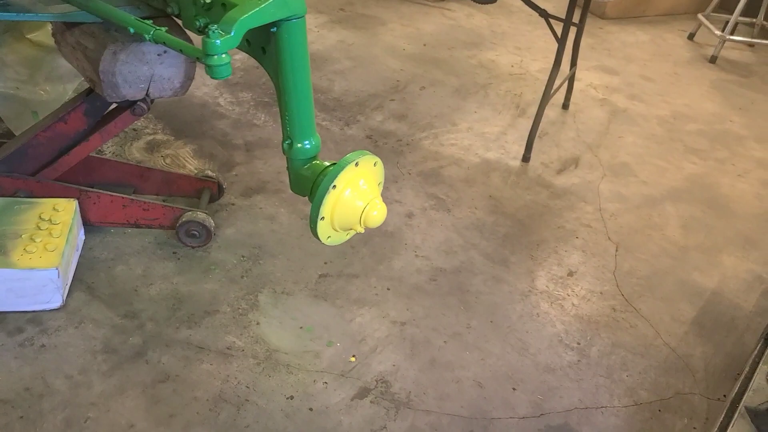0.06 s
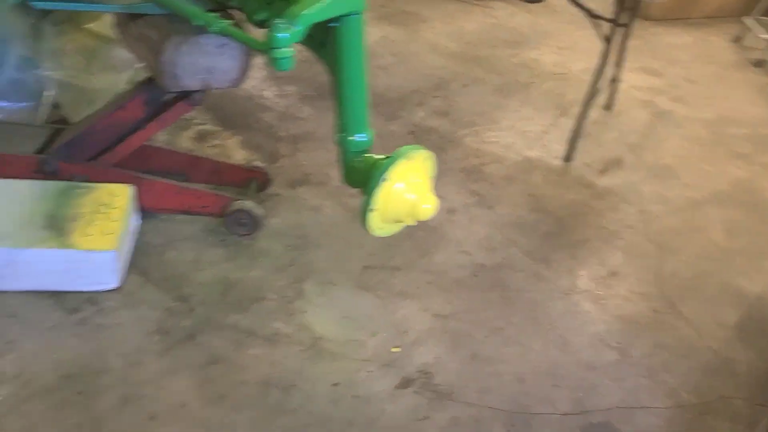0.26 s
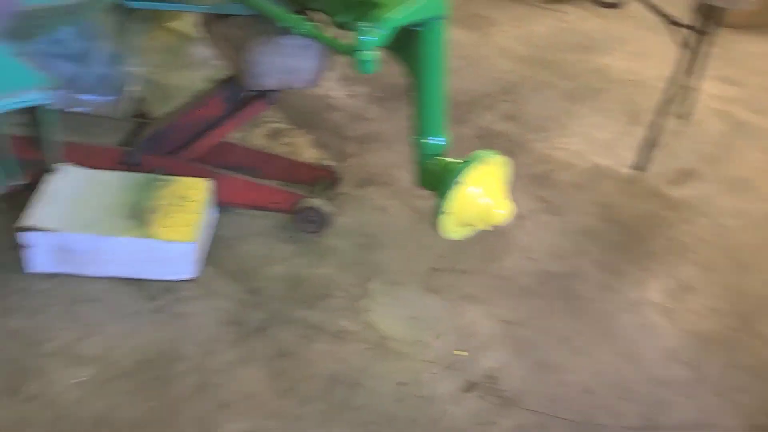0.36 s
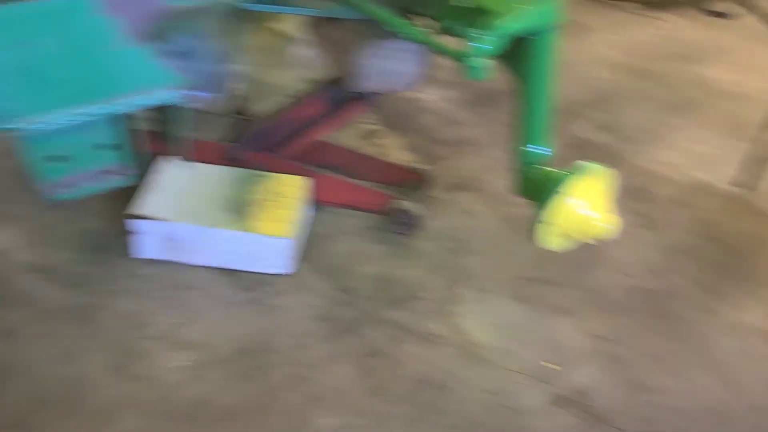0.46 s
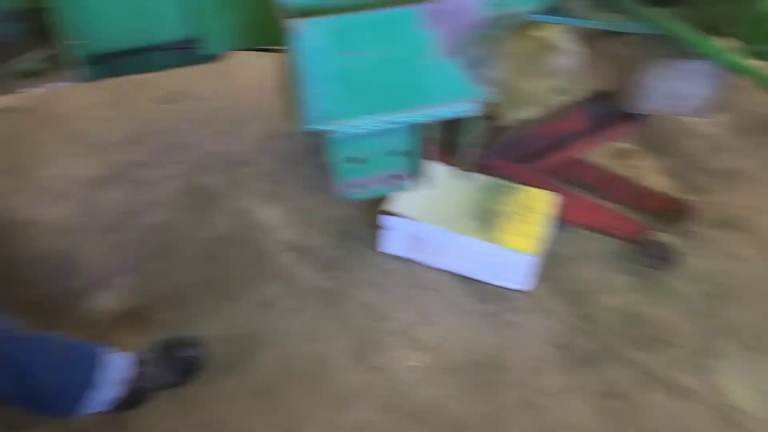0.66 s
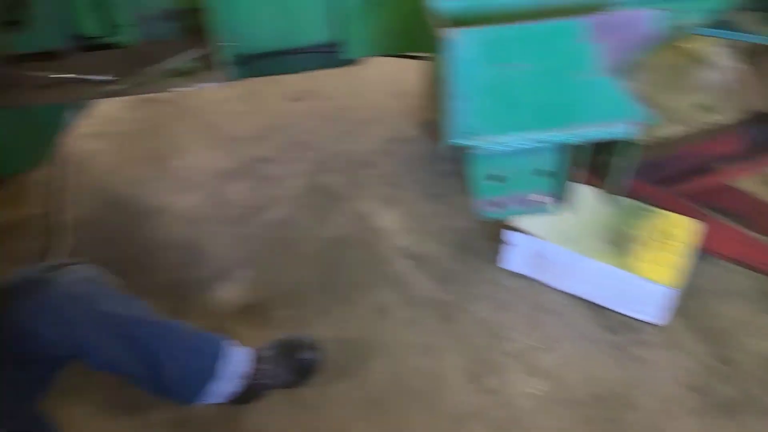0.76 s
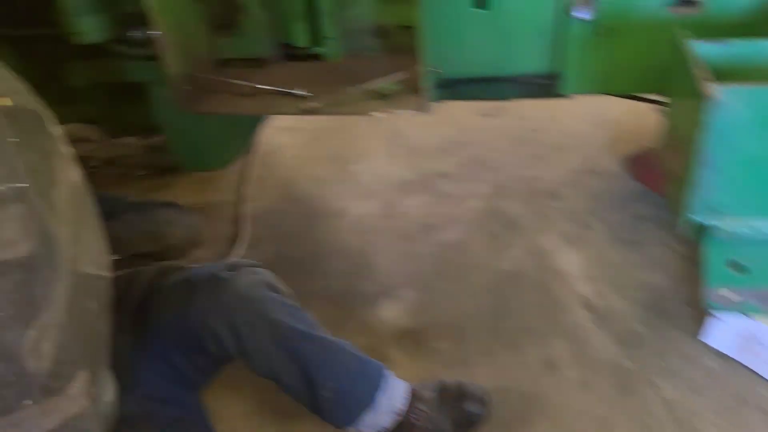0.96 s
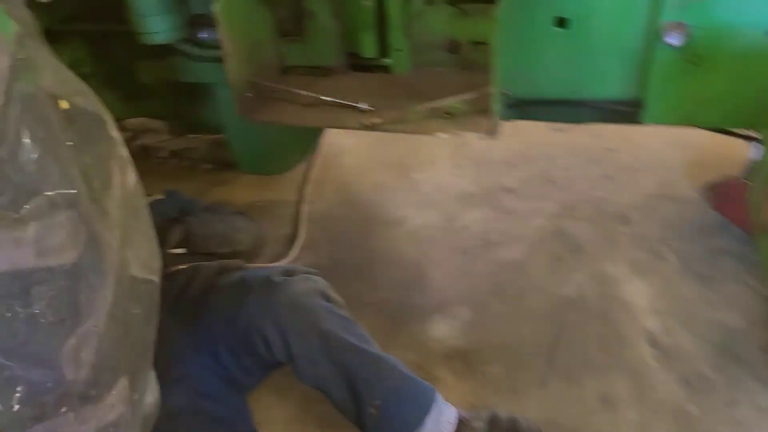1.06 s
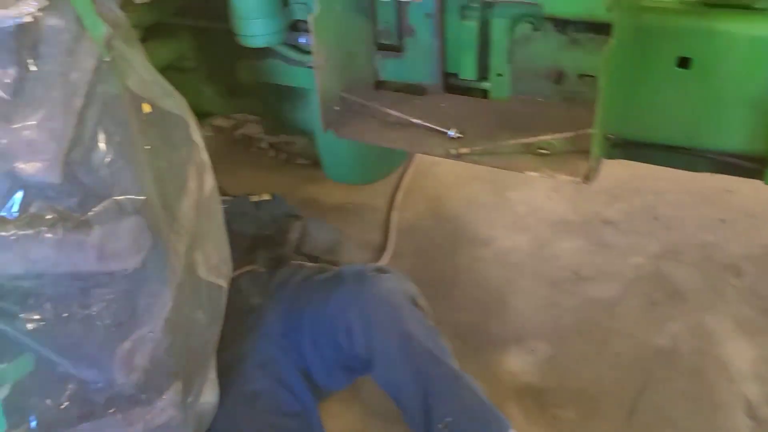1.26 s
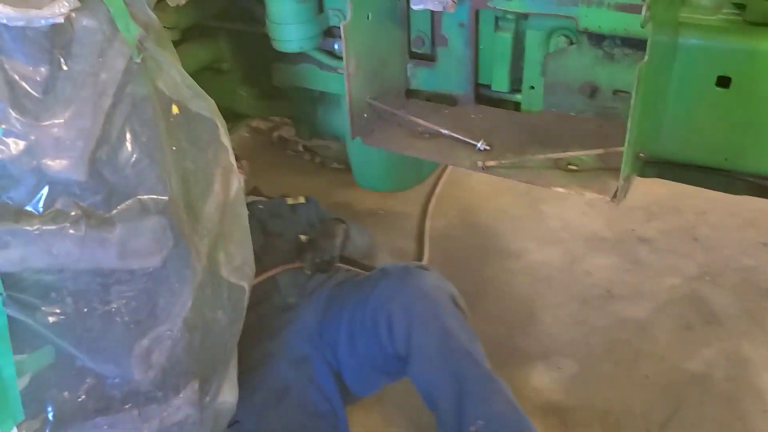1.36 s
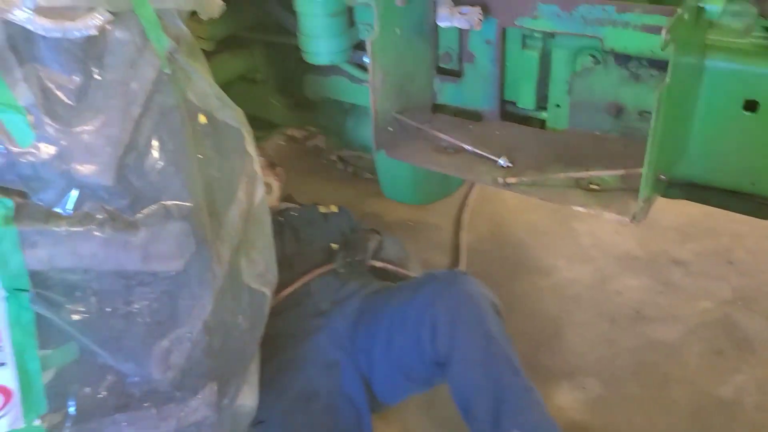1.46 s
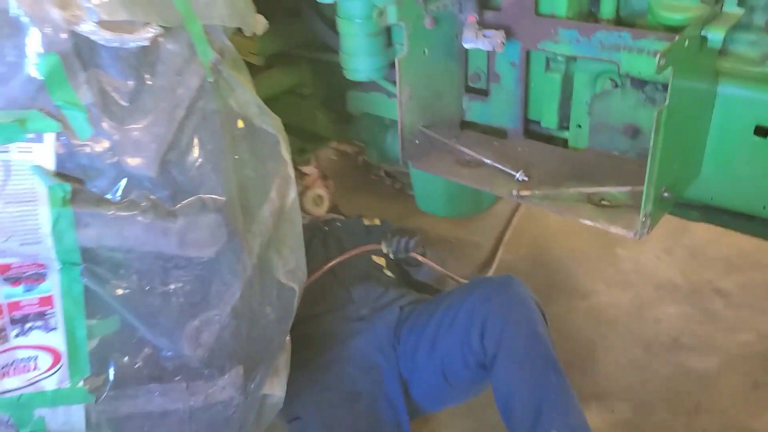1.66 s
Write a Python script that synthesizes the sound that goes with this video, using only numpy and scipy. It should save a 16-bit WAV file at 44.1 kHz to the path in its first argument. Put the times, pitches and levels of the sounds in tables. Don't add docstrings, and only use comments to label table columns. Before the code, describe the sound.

One brief blast of compressed air over a faint steady leak, followed by sheet-metal knocks and shuffling shoes.

```python
import sys
import numpy as np
from scipy import signal
from scipy.io import wavfile

SR = 44100
rng = np.random.default_rng(int(sys.argv[2]) if len(sys.argv) > 2 else 0)


def log_audio(samples):
    frames = np.atleast_2d(samples).T
    limited = np.clip(frames, -1, 1)
    pcm = np.round(limited * 32767).astype(np.int16)
    wavfile.write(sys.argv[1], SR, pcm)


def invert_db(level):
    return 10 ** (np.asarray(level, dtype=float) / 20)


N = 74970


def rms_one(x):
    return x / np.sqrt(np.mean(x ** 2) + 1e-20)


def at_hz(points, hz):
    table_hz, values = np.transpose(points)
    return np.interp(np.log(hz), np.log(table_hz), values)


def drift(rate_hz):
    pole = np.exp(-80 * np.pi * rate_hz / SR)
    noise = rng.standard_normal(N // 40 + 2002)
    slow = signal.lfilter([1], [1, -2 * pole, pole * pole], noise)[2000:]
    return np.interp(np.arange(N) / 40, np.arange(len(slow)), rms_one(slow))


def late(x, lead_s):
    return np.interp(np.arange(N) - lead_s * SR, np.arange(N), x)


# [f/Hz, power share/0-1]
COMMON_SHARE = [(60, 0.91), (300, 1), (700, 0.25), (1500, 0.43), (4000, 0.07), (15000, 0.32)]


def common_share(hz):
    return np.clip(at_hz(COMMON_SHARE, hz), 0, 1)


# [f/Hz, left minus right/dB]
LEFT_LEAN = [(60, -1), (180, -2.5), (550, -1), (1650, -9), (4970, -4), (15000, -3)]


def bands(gain_at):
    lead_s = 0.000438
    out, edges_hz = 0, 22 * 2 ** np.arange(0, 9.9, .4)
    white = rng.standard_normal((2, 3, N))
    for k, (low, high) in enumerate(zip(edges_hz, edges_hz[1:])):
        band = signal.butter(2, [low, high], "band", fs=SR, output="sos")
        both, left, right = signal.sosfilt(band, white[k % 2])
        hz = np.sqrt(low * high)
        share, lean = common_share(hz), invert_db(at_hz(LEFT_LEAN, hz) / 2)
        shared, own = np.sqrt(share), np.sqrt(1 - share)
        left_out = lean * (shared * both + own * left)
        right_out = (shared * late(both, lead_s * min(1, hz / 900)) + own * right) / lean
        out = out + gain_at(hz) * np.array([left_out, right_out])
    return out


def narrow(hz, width_hz):
    pole, share = np.exp(-np.pi * width_hz / SR), common_share(hz)
    a = [1, -2 * pole * np.cos(2 * np.pi * hz / SR), pole * pole]
    length = N + SR // 4
    white = np.sqrt(share) * rng.standard_normal(length)
    white = white + np.sqrt(1 - share) * rng.standard_normal((2, length))
    once = signal.lfilter([1, 0, -1], a, white)
    return rms_one(signal.lfilter([1, 0, -1], a, once)[:, -N:])


def ring(clicks, hz, t60_s):
    pole, w = invert_db(-60 / (t60_s * SR)), 2 * np.pi * hz / SR
    return signal.lfilter([0, np.sin(w)], [1, -2 * pole * np.cos(w), pole * pole], clicks + 1e-18)


# [f/Hz, density/dB per Hz]
LEAK_SPECTRUM = [(25, -3.5), (90, -8.5), (230, -20.5), (700, -11.5), (1300, -16.5), (3600, -11.5),
                 (4800, -7), (16000, -3.5)]
# [t/s, level/dB]
LEAK_LEVEL_DB = [
    (0, -37),
    (.9, -38.5),
    (1.2, -36),
    (1.7, -34.5),
]


def leak():
    hiss = rms_one(bands(lambda hz: invert_db(at_hz(LEAK_SPECTRUM, hz) + 1.4 * drift(2))))
    return hiss * invert_db(np.interp(np.arange(N) / SR, *np.transpose(LEAK_LEVEL_DB)))


# [f/Hz, width/Hz, level at start/dB]
FADING_CLANK = [(959, 64, -48), (1100, 63, -52), (51, 30, -55.5), (1400, 42, -59), (1760, 110, -57)]


def fading():
    fall_db = 81 * np.arange(N) / SR
    return sum(invert_db(db - fall_db) * narrow(hz, width_hz) for hz, width_hz, db in FADING_CLANK)


# [t/s, level/dB, brightness/dB per octave]
NOZZLE_FLOW = [
    (0.191, -57, -4.5),
    (0.2, -18, 3.5),
    (0.209, -14, 3),
    (0.252, -19.5, 1.7),
    (.3, -21, 0),
    (.5, -20.5, .5),
    (0.553, -18.5, 1.7),
    (0.591, -27, 0.5),
    (0.616, -46.5, -4),
]
# [f/Hz, density/dB per Hz]
JET_SPECTRUM = [(40, -3), (130, -3), (300, -6), (500, -5), (1000, -4), (1350, -3.5), (3000, 1.5),
                (16000, -2.5)]
# [f/Hz, width/Hz, level/dB]
HOSE_MODES = [(57, 21, -33), (126.4, 14, -22), (277.5, 20, -28.5), (351.5, 42, -26.5), (1266, 210, -19),
              (1555, 83, -23)]


def jet():
    pivot_hz, gust_db = 3000, .5
    t, (flow_s, flow_db, flow_tilt) = np.arange(N) / SR, np.transpose(NOZZLE_FLOW)
    tilt, gust = np.interp(t, flow_s, flow_tilt), drift(19)

    def band_gain(hz):
        colour_db = at_hz(JET_SPECTRUM, hz) + tilt * np.log2(hz / pivot_hz)
        return invert_db(colour_db + gust_db * gust + 1.5 * drift(18))

    air = rms_one(bands(band_gain))
    body = sum(invert_db(db) * narrow(hz, width_hz) for hz, width_hz, db in HOSE_MODES)
    air = air + invert_db(-4 * tilt) * body
    return air * invert_db(np.interp(t, flow_s, flow_db, left=-200, right=-200))


# [f/Hz, t60/s]
SHOP_T60 = [(60, 0.19), (300, 1.06), (800, 1.82), (1600, 1.01), (4000, 1.066), (8000, 0.63), (15000, 0.23)]


def shop_response():
    t = np.arange(N) / SR

    def band_decay(hz):
        t60_s = at_hz(SHOP_T60, hz)
        return invert_db(-60 * t / t60_s) / np.sqrt(t60_s)

    tail = bands(band_decay) * (1 - np.exp(-t / 0.0049))
    return tail / np.sqrt(np.sum(tail ** 2) / 2)


# [t/s, peak level/dB, f/Hz]
LOW_THUDS = [
    (.191, -34, 71.5),
    (0.777, -40.5, 150),
    (0.798, -44, 73.4),
    (0.942, -38, 302),
    (.95, -40, 98.5),
    (1.224, -34.5, 112),
    (1.319, -25.5, 304),
    (1.315, -37, 91),
    (1.492, -34, 210),
    (1.554, -30.5, 107),
]


def thuds():
    out = np.zeros(N)
    for s, db, hz in LOW_THUDS:
        click = np.zeros(N)
        click[int(s * SR)] = invert_db(db)
        out += ring(click, hz, 6.2 / hz)
    return out


# [centre t/s, length/s, level/dB, f/Hz]
SHOE_DRAGS = [
    (0.777, 0.11, -53.5, 734),
    (0.982, 0.058, -55.5, 400),
    (1.008, 0.1, -58, 713),
    (1.13, 0.076, -51, 760),
    (1.13, 0.062, -57.5, 372.7),
    (1.676, 0.12, -48.5, 602),
]


def drags():
    t, width_hz = np.arange(N) / SR, 150
    return sum(invert_db(db) * np.exp(-((t - s) / length_s) ** 2) * narrow(hz, width_hz)
               for s, length_s, db, hz in SHOE_DRAGS)


# [t/s, level/dB, swell/s, rattle length/s, contact cut f/Hz]
PART_KNOCKS = [
    (1.219, -25.5, 0.00027, 0.0072, 1940),
    (1.236, -13, 0.039, .017, 2770),
    (1.313, -25, 0.0009, .03, 8600),
    (1.364, -32.5, 0.0037, 0.01, 4000),
    (1.4, -28.5, 0.026, 0.026, 2500),
    (1.483, -33, 0.0014, 0.021, 3400),
    (1.573, -42, 0.0075, 0.028, 1800),
    (1.693, -24.5, .003, 0.0095, 1400),
]
# [f/Hz, level/dB, t60/s]
PART_MODES = [(326, -10.5, 0.067), (530, -5.5, .035), (708, -3, 0.041), (844, -6, 0.034), (960, -1, 0.043),
              (1164, 1, 0.045), (1246, -2, 0.039), (1388, 1, 0.044), (1740, -5.5, 0.016), (2080, -8, .03),
              (2230, -7, 0.032), (2426, -2.5, 0.035), (3270, -13, 0.018), (3700, -11.5, 0.011)]


def knocks():
    touches_per_s, spread_db = 1200, 6
    out, span = np.zeros(N + SR), SR // 3
    t, shape = np.arange(span) / SR, (len(PART_MODES) + 1, span)
    for s, db, swell_s, length_s, cut_hz in PART_KNOCKS:
        touches = rng.random(span) < touches_per_s / SR
        hits = touches * (1 - np.exp(-t / swell_s)) * np.exp(-t / length_s) * 1.11
        hits[0] = np.exp(-swell_s / 0.00099)
        sizes = invert_db(spread_db * rng.standard_normal(shape)) * rng.choice([-1, 1], shape)
        body = sum(ring(hits * size * invert_db(mode_db - 9.5), hz, t60_s)
                   for (hz, mode_db, t60_s), size in zip(PART_MODES, sizes))
        contact = signal.butter(2, [280, min(cut_hz, SR / 3)], "band", fs=SR, output="sos")
        start = int(s * SR)
        out[start:start + span] += invert_db(db) * signal.sosfilt(contact, body + 3 * hits * sizes[-1])
    return out[:N]


def scene():
    jet_room_db, knock_room_db, thud_room_db = -6, -3.5, -2.5
    knock_lead_s, knock_pan_db, corner_db_per_s = 0.00029, -2.5, 38
    air, knock, thud, shop = jet(), knocks(), thuds(), shop_response()
    corner = shop * invert_db(-corner_db_per_s * np.arange(N) / SR)
    wet = signal.fftconvolve(shop, invert_db(jet_room_db) * air[1:], axes=1)
    struck = invert_db(knock_room_db) * knock + invert_db(thud_room_db) * thud
    wet += signal.fftconvolve(corner, struck[None], axes=1)
    near = np.array([knock * invert_db(knock_pan_db / 2),
                     late(knock, knock_lead_s) * invert_db(-knock_pan_db / 2)])
    return air + wet[:, :N] + near + thud + leak() + fading() + drags()


def band_limit(x):
    return signal.sosfilt(signal.butter(12, 16760, fs=SR, output="sos"), x)


# [f/Hz, width/Hz, level/dB]
CAVITY = [(6030, 1800, 4), (9200, 1870, -2), (11900, 1800, 3), (14700, 1900, 4)]


def record(dry):
    for hz, width_hz, db in CAVITY:
        w, q, g = 2 * np.pi * hz / SR, np.pi * width_hz / SR, invert_db(db / 2)
        b = [1 + q * g, -2 * np.cos(w), 1 - q * g]
        a = [1 + q / g, -2 * np.cos(w), 1 - q / g]
        dry = signal.lfilter(b, a, dry)
    dry = 1.4 * np.tanh(dry / 1.4)
    top_cut = signal.ellip(20, .5, 120, 15520, fs=SR, output="sos")
    mix = signal.sosfilt(top_cut, dry)
    return band_limit(mix)


dry = scene()
out = record(dry)
log_audio(out)
```